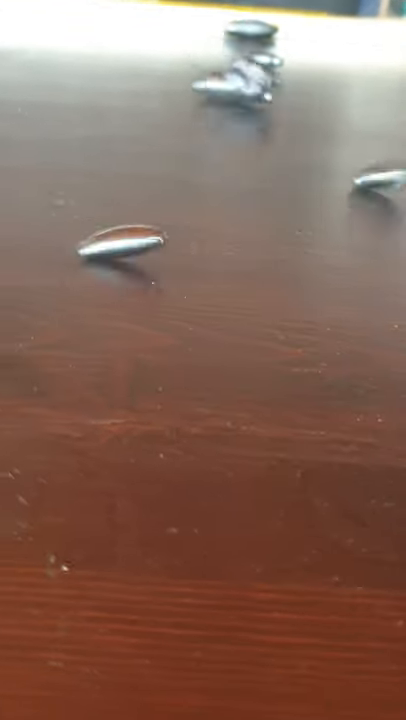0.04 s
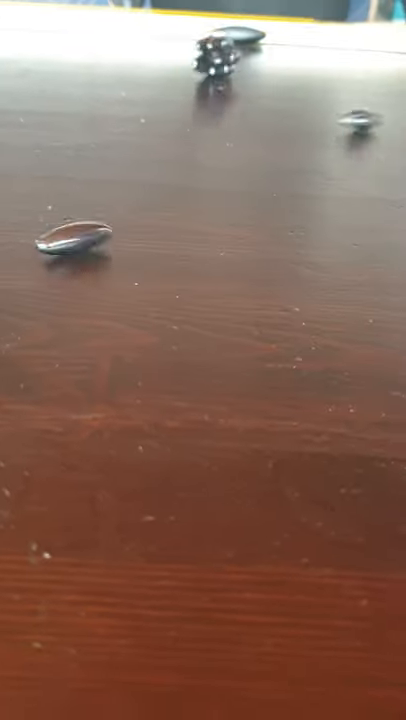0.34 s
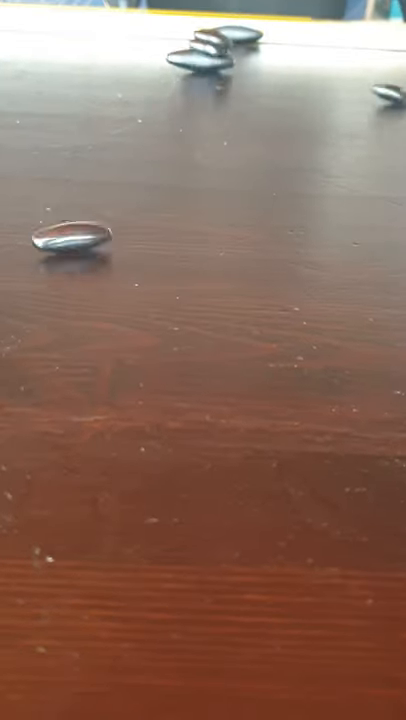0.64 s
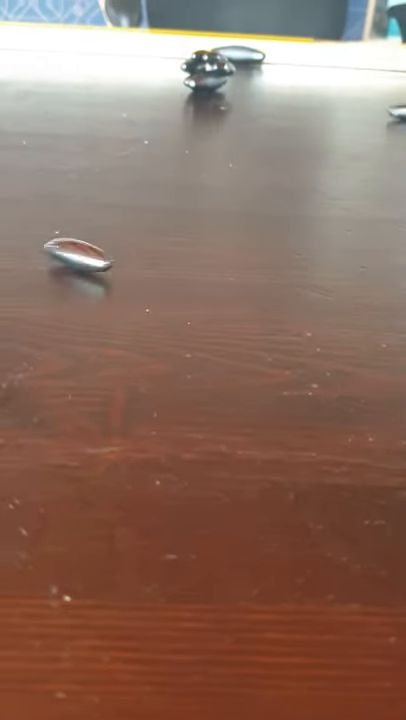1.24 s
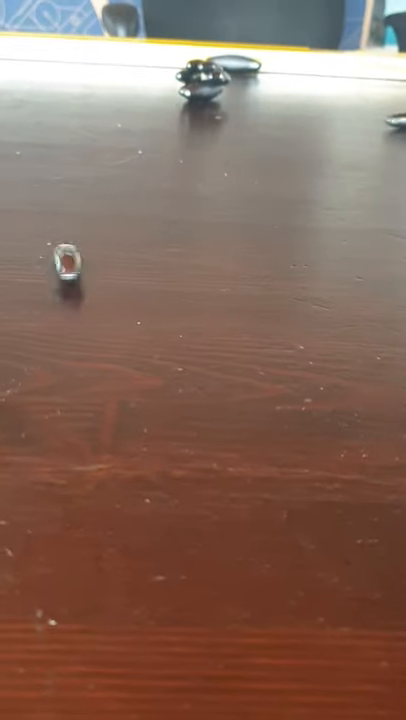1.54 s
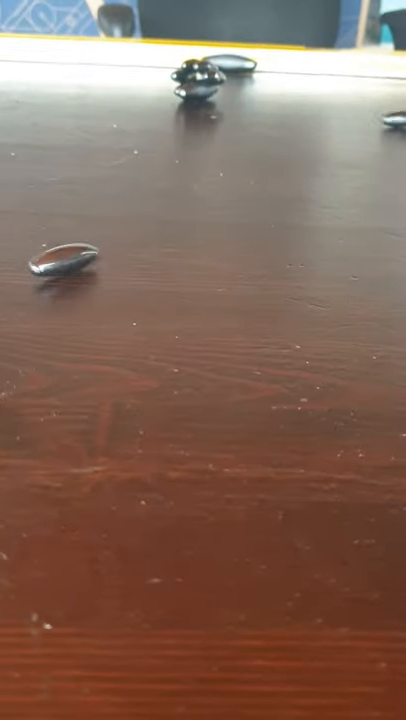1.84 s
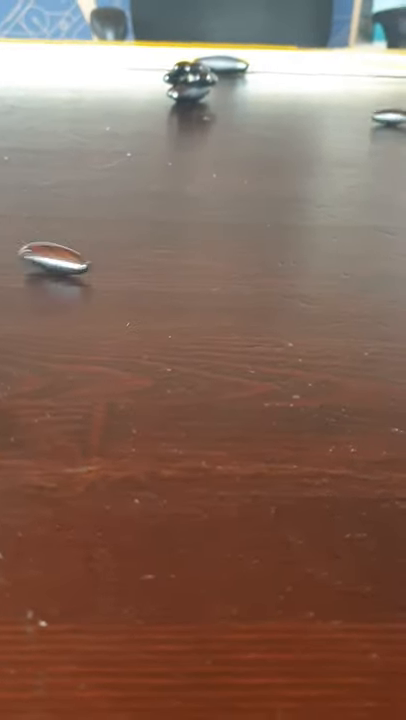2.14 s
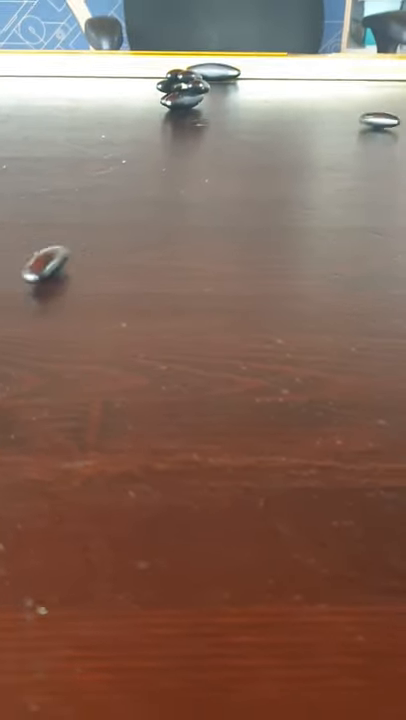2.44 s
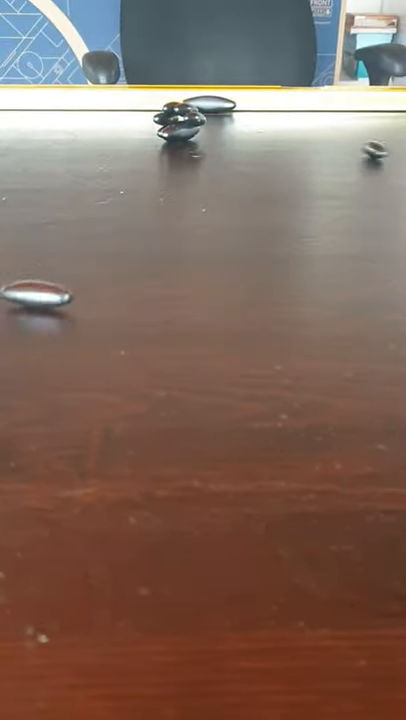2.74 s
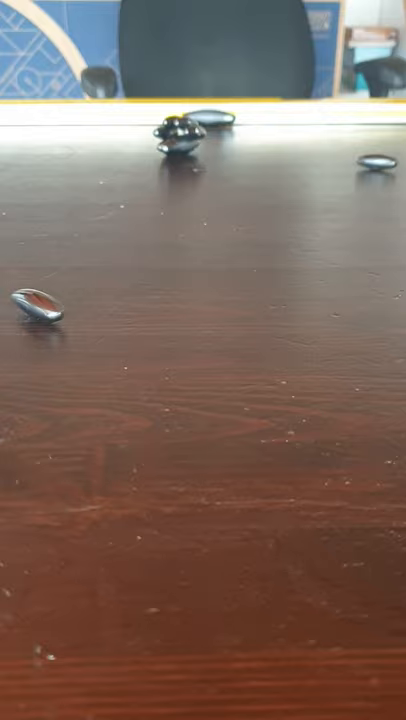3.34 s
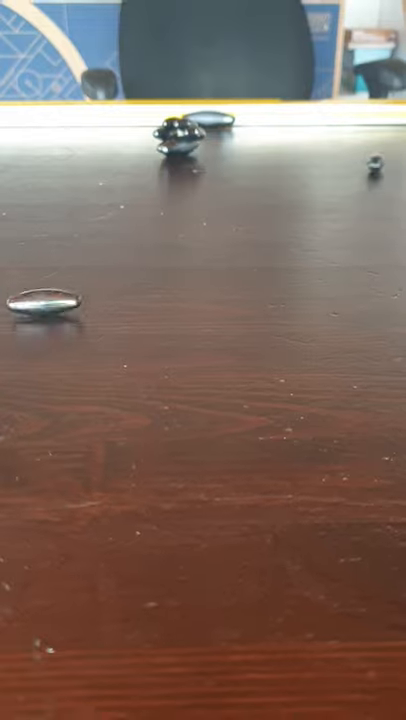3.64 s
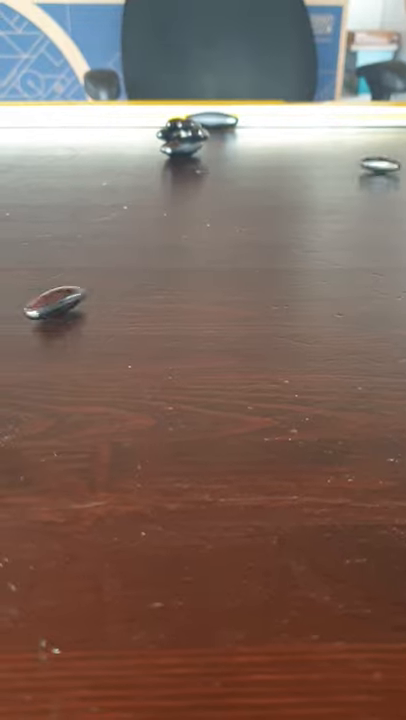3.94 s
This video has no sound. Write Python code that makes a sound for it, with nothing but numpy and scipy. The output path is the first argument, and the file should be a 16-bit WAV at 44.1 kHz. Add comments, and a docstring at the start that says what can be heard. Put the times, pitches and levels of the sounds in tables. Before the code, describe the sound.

Small metal magnets tumble over a wooden table, clicking together and rattling to rest within a second. One keeps spinning with a faint hum and light ticks, while a few dry handling taps sound on the right in a quiet room.

```python
"""A small hard room, a stereo pair of microphones at a wooden table.
Oval magnets tumble over the top, knocking it into ringing, snap together with metal clicks and
rattle into one rocking clump, all in the first second. A loose magnet keeps spinning on the wood
with a faint hum and a few light ticks, over room air and a low rumble.
Later, small dry handling taps reach the right microphone only, with just a trace of room echo."""
import sys
import numpy as np
from scipy import signal
from scipy.fft import rfft, irfft
from scipy.io import wavfile

SR = 44100
rng = np.random.default_rng(int(sys.argv[2]) if len(sys.argv) > 2 else 0)


def unload_wav(signal):
    """Save mono or channel-first audio to the path in sys.argv[1] as 16-bit WAV at rate SR, clipped to [-1, 1]."""
    wavfile.write(
        sys.argv[1],
        SR,
        np.round(np.clip(np.atleast_2d(signal).T, -1, 1) * 32767).astype(np.int16),
    )


N = 176400

# Every pan_db is left minus right; likeness is the correlation between the two microphones.
# Colour of the room air: freq_hz, level_db
AIR_SPECTRUM = [(15, -59.5), (30, -21.5), (60, -9), (82, -5.5), (117, -12), (190, -14.5), (223, -2.5),
                (326, -12.5), (405, -16.5), (600, -16.5), (1230, -33), (6000, -43.5), (8500, -52.5),
                (12900, -39), (16000, -47)]
# Stereo width of the air: freq_hz, likeness
AIR_LIKENESS = [(30, 0.99), (100, 1), (300, 0.9), (700, 0.095), (2000, 0.037), (16000, 0)]
# Balance of the air: freq_hz, pan_db
AIR_PAN = [(50, 6.5), (300, -5), (1000, -1), (12000, 1)]
# Slow swell shared by the air and the hum: time_s, level_db
BED_SWELL = [(0, -66), (1.0, -63), (1.599, -63.5), (2.4, -65.5), (2.898, -61), (3.3, -58), (3.699, -59),
             (4, -56)]
# Swell of the rumble: time_s, level_db
RUMBLE_SWELL = [(1.3, -77.5), (2.2, -73), (2.8, -69), (3.3, -61), (3.801, -56.5)]
# Table resonances under the spinning magnet: pitch_hz, width_hz, level_db
HUM_RESONANCES = [(232.6, 15, -9), (256.5, 49, -14.5), (655, 37, -16)]
# Ticks of the spinning magnet on the table: start_s, level_db
SPIN_TICKS = [(1.185, -45.5), (1.745, -53), (2.119, -57), (2.28, -49), (3.18, -51.5), (3.843, -47)]
# Faint sounds after the clatter: start_s, pitch_hz, width_hz, level_db, rise_s, decay_s
FAINT_SOUNDS = [(0.948, 2774, 704, -62, 0.00098, 0.031), (0.951, 2216, 199, -60.5, .004, 0.048),
                (1.078, 235.4, 159.7, -41, 0.0067, 0.006), (1.08, 5610, 1515, -82, 0.039, 0.28),
                (1.08, 13900, 2467, -78, 0.1, 0.12), (1.249, 1680, 300, -71.5, 0.074, 0.12)]
# Reverberation time of the room: freq_hz, t60_s
ROOM_DECAY = [(150, 0.66), (500, 0.67), (1500, 0.24), (5000, 0.4), (9000, .43), (15000, 0.29)]
# Stereo width of the ringing of room and wood: freq_hz, likeness
RING_LIKENESS = [(100, 1), (350, 0.93), (700, 0.67), (1500, 0.3), (16000, 0.13)]
# Balance of that ringing: freq_hz, pan_db
RING_PAN = [(100, 4.5), (400, 3.5), (1000, -2), (2500, -0.5), (5500, -1), (8000, 5.5), (12000, -2)]
# Handling taps: start_s, level_db, low_cut_hz, high_cut_hz, edge_db, edge_cut_hz, thud_db
HANDLING_TAPS = [(1.4807, -17.5, 149.5, 1511, -10, 5970, -15), (1.615, -21.5, 330, 1580, -22, 3520, -12.5),
                 (1.6166, -18, 400, 1610, -19, 3544, -13), (1.878, -2.5, 263, 2908, -5.5, 11900, -11.5),
                 (1.8787, -9.5, 900, 2960, -9, 9100, -26), (2.716, -5.5, 120.1, 1502, -5, 15940, -2.5),
                 (3.325, -22, 300.6, 1000, -23.5, 3004, -14), (3.347, -6, 693, 1280, -33.5, 3480, -22),
                 (3.4069, -10, 723, 1473, -34, 3480, -22), (3.8687, -10, 251.6, 1325, -6.5, 16050, -17),
                 (3.962, -20.5, 247, 1231, -17, 5980, -8)]
# Colour of a tap's crisp edge: freq_hz, level_db
EDGE_SPECTRUM = [(300, 5), (1100, 18), (2400, 12.5), (3300, 14), (4300, 16), (6000, 18), (9000, -1.5),
                 (12000, 16), (15000, 16.5), (17000, -37)]
# Colour of the wood's dense ringing: freq_hz, level_db
WOOD_SPECTRUM = [(40, -25.5), (110, -3.5), (190, -8), (320, -1), (550, 4), (850, -1), (1150, -3.5),
                 (1650, 1.5), (2200, -0.5), (3000, 5), (3800, -3.5), (9000, -12)]
# Decay of that ringing: freq_hz, t60_s
WOOD_DECAY = [(100, 0.073), (500, 0.07), (1200, 0.13), (3000, 0.13), (8000, 0.022)]
# Strongest modes of the table top: pitch_hz, level_db, t60_s
TABLE_MODES = [(129.5, -10.5, 0.28), (305, 3, 0.26), (382.3, -2, 0.083), (418, -2.5, 0.037),
               (543.6, 1, 0.559), (632, -2, 0.15), (730, -4, 0.2), (829.3, 4, 0.17), (851, 2.5, 0.16),
               (1001, -4.5, .15), (1466, -2.5, 0.043), (1566, -7.5, 0.11)]
# Magnets landing on wood: start_s, level_db, brightness_hz, ring_db, pan_db
LANDINGS = [(.0011, -9.5, 2820, 10, -8.5), (0.0362, 2.5, 3100, 1, -6), (.0528, -2.5, 3400, -1, 6),
            (0.0770, 4, 3030, 3.5, -7), (0.0867, -6, 1920, 4, -2), (0.1074, 0, 2300, 1, -2),
            (0.122, 0, 2700, -11, -10.5), (.1366, 2.5, 1460, 7, -4.5), (0.1687, -4.5, 2170, -10, -7),
            (0.1882, 1, 2340, 6.5, -2), (0.2439, -3.5, 2010, -2.5, 3), (0.2674, -1, 3260, -10, -13.5),
            (0.2824, -8, 3100, -6, 7.5), (0.2899, -5.5, 1220, 9, 5), (0.3121, -3, 3270, -1.5, -8.5),
            (0.3505, -11, 2870, -8, -17), (.3788, 2.5, 4840, -1.5, -4.5), (.393, -10.5, 796, 5, 8.5),
            (0.4071, -3, 3400, -2.5, -3), (0.4337, -12, 880, 13, 0), (0.4467, -11, 935, 10, -12),
            (0.4696, -9, 1610, 6.5, 11), (0.486, -18, 2450, -4, 5), (0.5168, -4, 2750, 1, -2),
            (0.525, -4, 2410, 1, -2.5), (0.6639, -19.5, 6100, -15, -9), (.6862, -16, 6120, -5, -5),
            (0.7662, -24, 5970, -6.5, -3.5), (0.9478, -29, 2960, -8, -8)]
# Runs of three quick bounces: start_s, level_db
BOUNCE_RUNS = [(.5604, -10.5), (0.6041, -13), (0.6462, -17.5)]
# Strength of the taps as the clump rocks to rest: time_s, level_db
ROCKING_LEVEL = [(0, -25), (0.201, -20.5), (0.332, -23.5), (.46, -22.5), (0.581, -22.5), (.68, -26),
                 (.77, -30.5), (.8, -42.5), (0.918, -42), (0.972, -63)]
# Colour of a metal click: freq_hz, level_db
METAL_SPECTRUM = [(200, -22), (1500, -7.5), (3000, -5), (4300, -9.5), (5200, -6.5), (6100, -7),
                  (6800, -7.5), (9000, -9), (11000, -3.5), (13000, -6), (15500, -8), (17000, -18.5)]
# Balance of the snaps by frequency: freq_hz, pan_db
SNAP_PAN = [(3000, -3.5), (5500, -3.5), (8200, 8), (11000, 1.5)]
# Magnet striking magnet: start_s, level_db, chatter_db, pan_db
MAGNET_SNAPS = [(0, -17, 10.5, -0.5), (0.0178, 5, -12, 1), (0.033, -8, 3.5, -8), (0.065, -12.5, 9.5, 1),
                (0.094, -11, 5.5, -3.5), (0.0997, -4.5, 12, -1.5), (0.12, -8, -2.5, -0.5),
                (0.1739, 4.5, -14, -4.5), (0.1793, 4, -13, -5.5), (0.1941, 4, -1.5, 2.5),
                (0.2073, -3.5, 3, 2.5), (0.356, -4.5, -18, -1.5), (0.375, -18.5, -12, 5),
                (.406, -11.5, -19, -7), (0.43, -12.5, -14, 5), (.439, -12.5, -14, -7.5),
                (0.444, -9, -1, -4), (0.4537, -15, 4.5, 5), (0.4626, -11, 2, -2), (0.5078, -7.5, 8, 4),
                (0.5187, -9.5, 12.5, 0.5)]

RIGHT_LAG_S, CUTOFF_HZ = 0.00018, 16500
ROOM_WOOD_DB, ROOM_METAL_DB, ROOM_TAP_DB, ROOM_TAP_CUT_HZ = -11.5, -6.5, -28, 3770  # feeds to the echo


def amp(db):
    """Decibels to gain."""
    return 10 ** (np.asarray(db) / 20)


def unit(x):
    """Scales to an average energy of one per channel."""
    return x / np.sqrt(np.mean(np.sum(x ** 2, -1)) + 1e-20)


def read(points, hz):
    """Reads a table along log frequency."""
    f, value = np.transpose(points)
    return np.interp(np.log(hz + 1), np.log(f), value)


def swell(points):
    """Gain over the whole scene from a table of times and levels."""
    return amp(np.interp(np.arange(N) / SR, *np.transpose(points)))


def add(mix, start_s, sound):
    """Mixes a sound in at a time."""
    part = mix[..., max(round(start_s * SR), 0):][..., :sound.shape[-1]]
    part += sound[..., :part.shape[-1]]


def sides(pan_db):
    """Left and right gains."""
    return amp(np.array([[pan_db], [-pan_db]]) / 2)


def lowpass(x, hz, order):
    """Dulls the sound above hz."""
    return signal.sosfilt(signal.butter(order, min(hz, .4 * SR), fs=SR, output="sos"), x)


def highpass(x, hz):
    """Gently thins the sound below hz."""
    return signal.lfilter(*signal.butter(1, hz, "high", fs=SR), x)


def through(x, response):
    """Convolves, keeping the length."""
    return signal.fftconvolve(np.atleast_2d(x), np.atleast_2d(response), axes=1)[:, :x.shape[-1]]


def click(spectrum, size=4096):
    """The shortest causal click with this spectrum."""
    log_gain = np.log(amp(read(spectrum, abs(np.fft.fftfreq(size, 1 / SR)))))
    minimum_phase = np.exp(np.conj(signal.hilbert(log_gain)))
    return unit(np.fft.ifft(minimum_phase).real)


def arrival(size=8192):
    """An impulse that reaches the left microphone first."""
    x = np.zeros((2, size))
    x[0, 0] = x[1, round(RIGHT_LAG_S * SR)] = 1
    return x


def noise_band(hz, width_hz):
    """Stereo noise in one resonance, at an RMS of one."""
    f = np.fft.rfftfreq(N, 1 / SR)
    spectrum = rfft(rng.standard_normal((2, N))) / (1 + (2 * (f - hz) / width_hz) ** 2)
    return unit(irfft(spectrum, N)) * np.sqrt(N)


def ringing(decay, size=8192):
    """Dense stereo ringing, each band dying at its own speed; the bass is nearly mono."""
    hz, t, (left, other) = signal.stft(rng.standard_normal((2, size)), SR, nperseg=256)
    hz = hz[:, None]
    likeness, pan = read(RING_LIKENESS, hz), amp(read(RING_PAN, hz) / 2)
    right = likeness * left + np.sqrt(1 - likeness ** 2) * other
    bands = np.array([left * pan, right / pan]) * amp(-60 * t / read(decay, hz))
    return signal.istft(bands, SR)[1][:, :size]


def room_air(level_db=-1):
    """Low room noise, alike at both microphones in the bass and wide in the treble."""
    f = np.fft.rfftfreq(N, 1 / SR)
    left, other = rfft(rng.standard_normal((2, N)))
    likeness = read(AIR_LIKENESS, f)
    right = likeness * left + np.sqrt(1 - likeness ** 2) * other
    colour = amp(read(AIR_SPECTRUM, f) + np.outer([1, -1], read(AIR_PAN, f)) / 2)
    return amp(level_db) * unit(irfft(np.array([left, right]) * colour, N)) * np.sqrt(N)


def rumble():
    """A low rumble, a little to the right, that grows toward the end."""
    return noise_band(hz=66.6, width_hz=13) * sides(-1.5) * swell(RUMBLE_SWELL)


def room_echo(x, onset_s=.008):
    """Reflections off the near, hard walls build up quickly and die away."""
    response = ringing(ROOM_DECAY, size=40000)
    t = np.arange(response.shape[1]) / SR
    build_up = 1 - np.exp(-(t / onset_s) ** 2)
    return through(x, unit(response * build_up))


def faint_sounds():
    """A small clink, a soft bump, a brief hiss and a slight squeak, each a swell of narrow noise."""
    out, t = np.zeros((2, N)), np.arange(N) / SR
    for start_s, hz, width_hz, db, rise_s, decay_s in FAINT_SOUNDS:
        envelope = np.minimum(t / rise_s, 1) * np.exp(-np.maximum(t - rise_s, 0) / decay_s)
        add(out, start_s, amp(db) * noise_band(hz, width_hz) * envelope)
    return out


def spin_hum(tone_hz=329.4, tone_db=-6, waver_hz=1.5):
    """The table hums under the spinning magnet: narrow resonances and a wavering tone, dead centre."""
    resonances = sum(amp(db) * noise_band(hz, width_hz)[0] for hz, width_hz, db in HUM_RESONANCES)
    pitch_hz = tone_hz + waver_hz * noise_band(0, width_hz=6)[0]
    tone = np.sqrt(2) * np.sin(2 * np.pi * np.cumsum(pitch_hz) / SR)
    return resonances + amp(tone_db) * tone


def spin_ticks():
    """The spinning magnet ticks very lightly on the table now and then."""
    out = np.zeros((2, N))
    for start_s, db in SPIN_TICKS:
        add(out, start_s, amp(db) * through(arrival(), click(METAL_SPECTRUM)))
    return out


def handling(softness_hz=590, thud_hz=79.2, thud_decay_s=0.0091):
    """Each tap is a soft push, a crisp edge and a low thud, on the right microphone only."""
    out, edge = np.zeros((2, N)), click(EDGE_SPECTRUM)
    t = np.arange(len(edge)) / SR
    pulse = np.exp(-2 * np.pi * softness_hz * t)
    thud = unit(np.sin(2 * np.pi * thud_hz * t) * np.exp(-t / thud_decay_s))
    for start_s, db, low_cut_hz, high_cut_hz, edge_db, edge_cut_hz, thud_db in HANDLING_TAPS:
        push = unit(lowpass(highpass(pulse, low_cut_hz), high_cut_hz, order=7))
        crisp = unit(lowpass(edge, edge_cut_hz, order=5))
        add(out[1], start_s, amp(db) * (push + amp(edge_db) * crisp + amp(thud_db) * thud))
    return out


def knock(db, bright_hz, ring_db, pan_db=0, ring_cut_hz=None):
    """A magnet meets wood: a pulse and short clack, dulled by the soft contact, and the top rings."""
    clack_hz, clack_decay_s, clack_db, modes_db = 2750, .0006, -8.5, -8.5
    hit = arrival()
    t = np.arange(hit.shape[1]) / SR
    clack = unit(through(hit, np.cos(2 * np.pi * clack_hz * t) * np.exp(-t / clack_decay_s)))
    pulse = highpass(-hit - amp(clack_db) * clack, hz=295)
    contact = unit(lowpass(pulse, bright_hz, order=5))
    hz, mode_db, t60_s = np.transpose(TABLE_MODES)[..., None]
    modes = amp(mode_db - 60 * t / t60_s) * np.sin(2 * np.pi * hz * t)
    struck_modes = unit(rng.standard_normal(len(TABLE_MODES)) @ modes)  # a new mix at each blow
    dense = through(ringing(WOOD_DECAY), click(WOOD_SPECTRUM))
    ring = unit(lowpass(dense, ring_cut_hz or bright_hz, order=3)) + amp(modes_db) * struck_modes
    return amp(db) * (sides(pan_db) * contact + amp(ring_db) * ring)


def tumbling(bounce_gap_s=0.0061, bounce_loss_db=0.5):
    """Magnets land on the table singly, then in short runs of weakening bounces."""
    out = np.zeros((2, N))
    for start_s, *landing in LANDINGS:
        add(out, start_s, knock(*landing))
    for start_s, db in BOUNCE_RUNS:
        for k in range(3):
            bounce = knock(db - k * bounce_loss_db, bright_hz=2780, ring_db=0)
            add(out, start_s + k * bounce_gap_s, bounce)
    return out


def rocking_clump(taps_per_s=120, spread_db=3):
    """The clump rocks on the wood in quick uneven taps that fade as it settles."""
    out = np.zeros((2, N))
    times, levels = np.transpose(ROCKING_LEVEL)
    for k, (slip, strength) in enumerate(rng.standard_normal((200, 2))):
        start_s = (k + .3 * slip) / taps_per_s
        if start_s < times[-1]:
            db = np.interp(start_s, times, levels) + spread_db * strength
            add(out, start_s, knock(db, bright_hz=1910, ring_db=11.5, ring_cut_hz=896.5))
    return out


def snaps(contact_s=0.00069, chatter_rise_s=0.0015, chatter_t60_s=.09):
    """Magnet strikes magnet: a hard click and a dying chatter of rebounds; each pair has its own ping."""
    ping_hz, ping_spread, ping_decay_s = 5700, .04, 0.00062
    out, hit = np.zeros((2, N)), arrival()
    t = np.arange(hit.shape[1]) / SR
    for start_s, db, chatter_db, pan_db in MAGNET_SNAPS:
        hz = ping_hz * (1 + ping_spread * rng.uniform(-1.3, 1))
        ping = unit(np.cos(2 * np.pi * hz * t) * np.exp(-t / ping_decay_s))
        ping_db = -5.5 + .45 * db  # harder snaps ring more
        grains = rng.standard_normal(hit.shape) * amp(5.0 * rng.standard_normal(len(t)))
        contact = unit(hit + 0.814 * unit(grains * t * np.exp(-t / contact_s)))
        chatter = unit(grains * amp(-60 * t / chatter_t60_s) * (1 - np.exp(-t / chatter_rise_s)))
        blows = amp(db) * sides(pan_db) * (contact + amp(chatter_db) * chatter)
        add(out, start_s, through(blows, unit(hit[0] + amp(ping_db) * ping)))
    colours = [[(hz, db + side * read(SNAP_PAN, hz) / 2) for hz, db in METAL_SPECTRUM]
               for side in (1, -1)]  # left, right
    return through(out, [click(colour) for colour in colours])


def scene():
    """At the microphones: the quiet bed, the clatter, the handling taps and the room's echo."""
    bed = (room_air() + spin_hum()) * swell(BED_SWELL) + rumble() + faint_sounds()
    metal = snaps() + spin_ticks()
    wood = tumbling() + rocking_clump()
    taps = handling()
    dull_taps = lowpass(taps, ROOM_TAP_CUT_HZ, order=1)
    echo = room_echo(amp(ROOM_WOOD_DB) * wood + amp(ROOM_METAL_DB) * metal + amp(ROOM_TAP_DB) * dull_taps)
    return bed + echo + taps + wood + metal


def record(dry):
    """The recorder clips peaks at full scale, then cuts the highest treble."""
    band_limit = signal.firwin(255, CUTOFF_HZ, window=("kaiser", 9), fs=SR)
    return signal.oaconvolve(np.clip(dry, -1, 1), band_limit[None], "same")


dry = scene()
out = record(dry)
unload_wav(out)
```